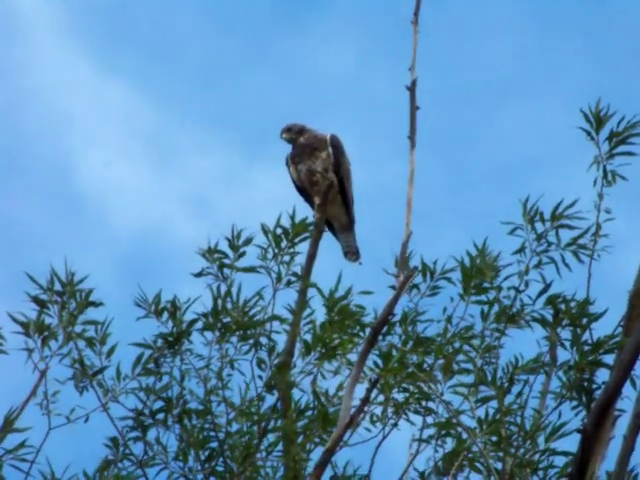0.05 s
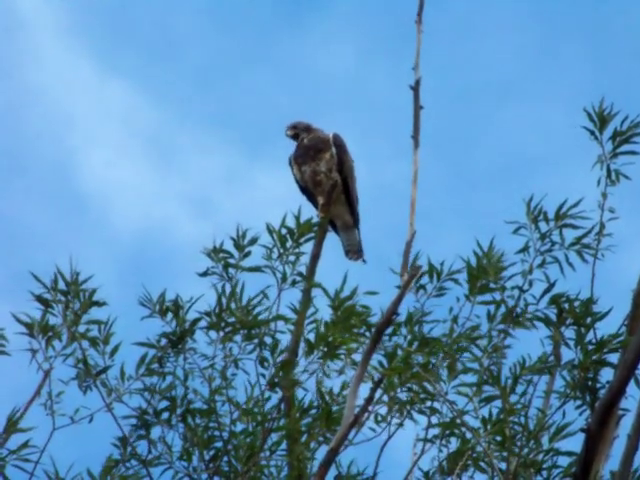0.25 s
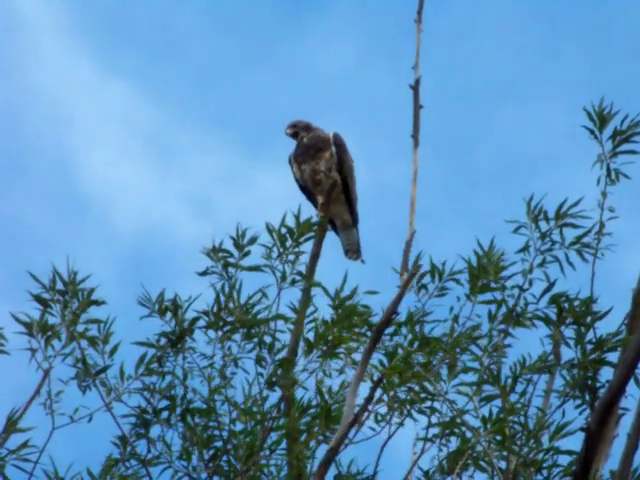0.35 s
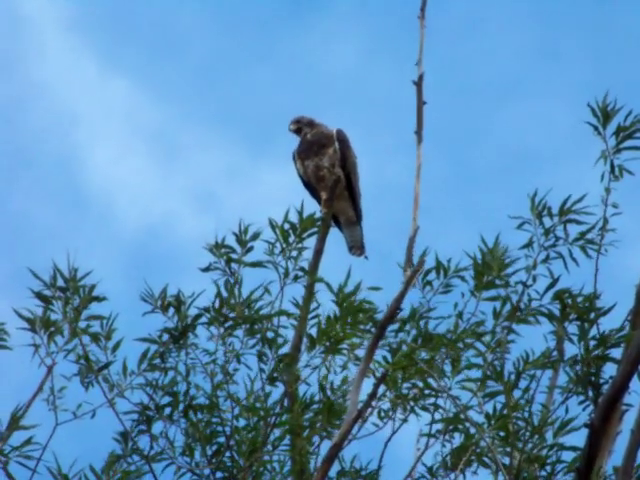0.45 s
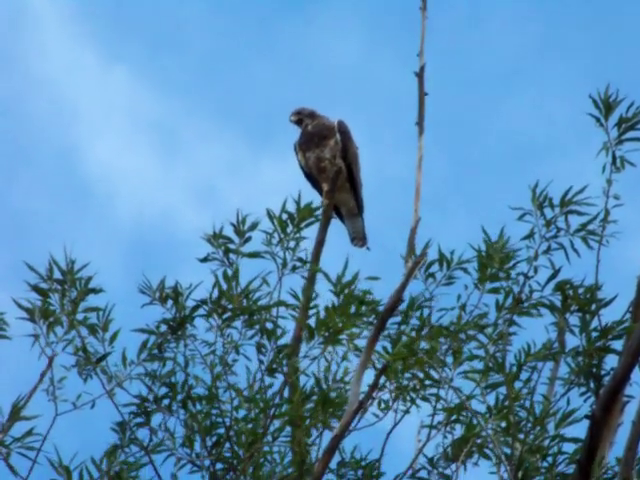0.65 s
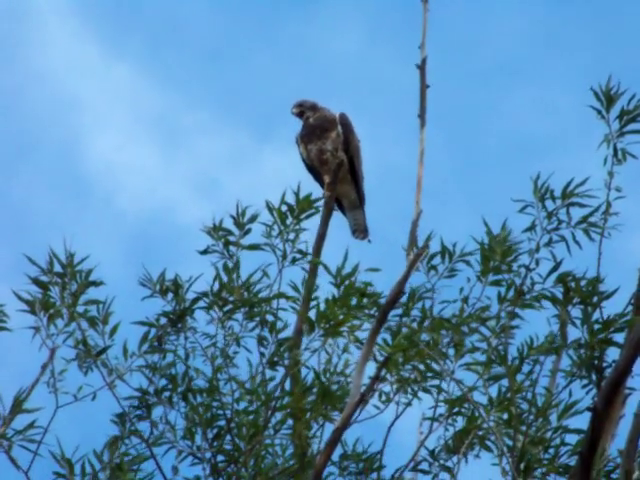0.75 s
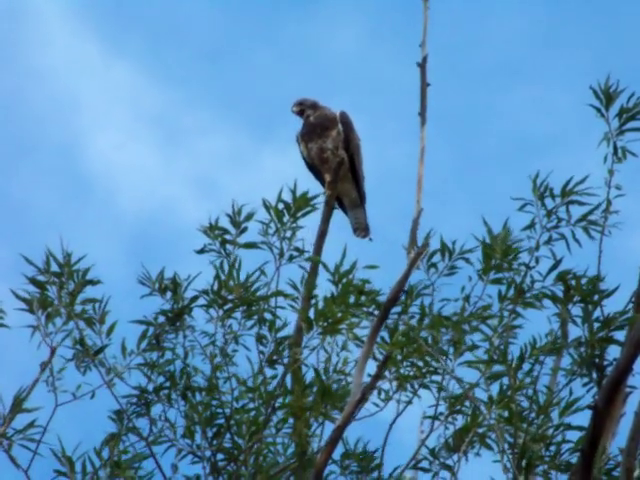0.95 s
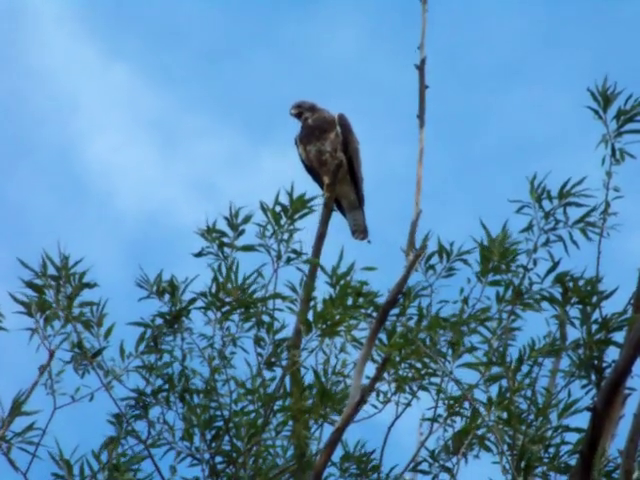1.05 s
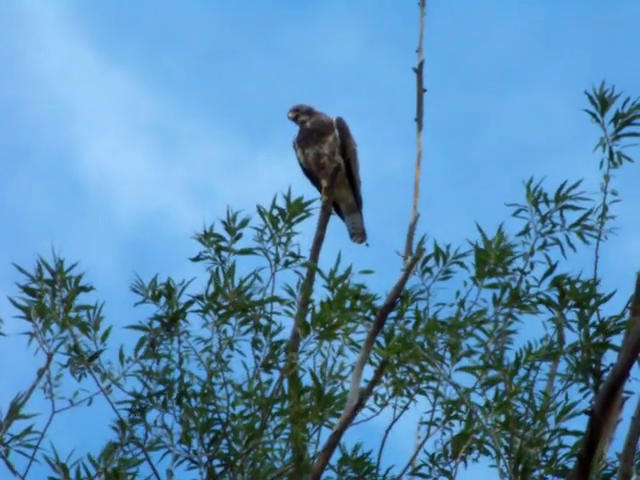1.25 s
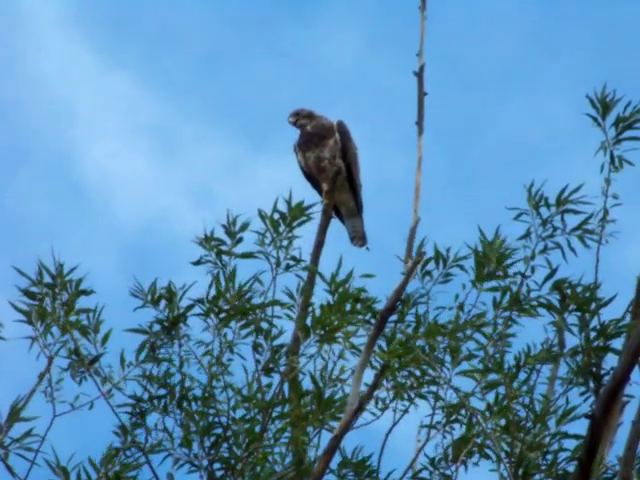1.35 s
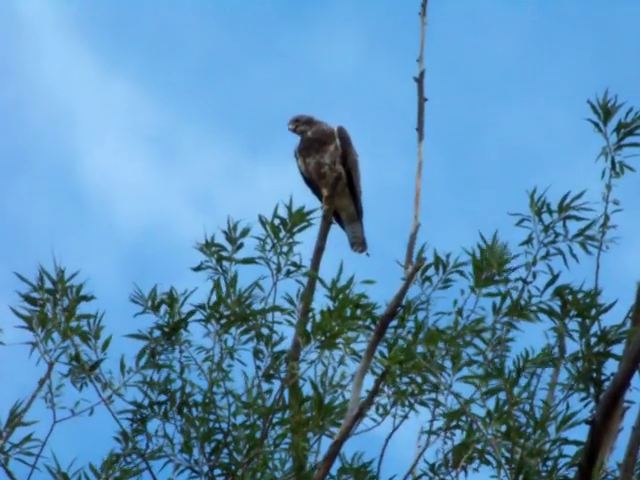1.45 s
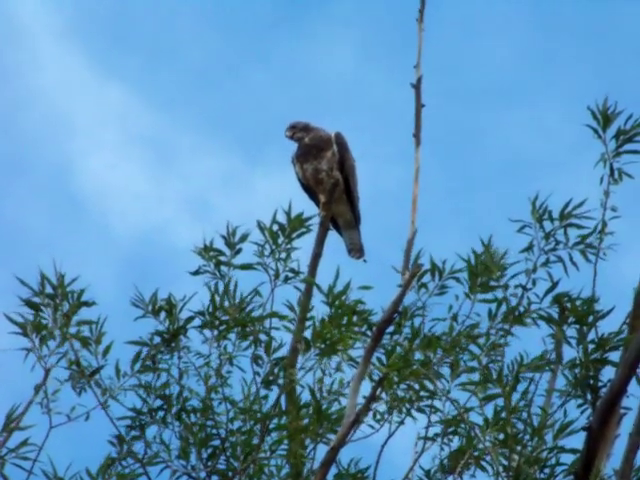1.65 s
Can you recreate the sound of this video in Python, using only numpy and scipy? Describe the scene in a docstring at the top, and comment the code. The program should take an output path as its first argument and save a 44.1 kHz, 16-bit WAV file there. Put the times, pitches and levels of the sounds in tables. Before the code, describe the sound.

Over quiet outdoor air with a few faint bumps, a young bird of prey gives a single scream from a treetop. It rises, cracks, drops, then turns to a fading rasp that trails into a thin, steady whistle.

```python
"""Outdoors among trees, over faint air noise and a few dull bumps, a young hawk screams once.
Its syrinx is a nonlinear oscillator: the note arches up with period doubling, cracks into chaos at the
top, falls cleanly, breaks into a long hoarse rasp and ends in a thin whistle. The throat filters the
voice; near surfaces return quick echoes, and scattering from the trees adds a faint tail."""
import sys
import numpy as np
from scipy import signal
from scipy.fft import rfft, irfft
from scipy.io import wavfile
from scipy.ndimage import uniform_filter1d

SR = 44100
rng = np.random.default_rng(int(sys.argv[2]) if len(sys.argv) > 2 else 0)


def to_wav(s):
    """Save 16-bit WAV."""
    ch = np.atleast_2d(s).T  # columns
    pcm = np.round(np.clip(ch, -1, 1) * 32767)  # PCM
    wavfile.write(sys.argv[1], SR, pcm.astype(np.int16))


N = 74970
T = np.arange(N) / SR

# Spectrum of the outdoor air: f/Hz, relative level/dB
AIR_SPECTRUM = [(20, -31.5), (36, -25.5), (45, 10), (55, -6.5), (80, -7), (110, -0.5), (220, -9),
                (310, -18), (420, -5), (560, -2.5), (830, 0), (1300, -7.5), (2000, -11), (3300, -10.5),
                (4800, -13.5), (7200, -19), (8300, -27)]
# Likeness of the air at left and right: f/Hz, shared fraction of power
AIR_COHERENCE = [(40, 0.69), (300, 0.071), (1000, 0.38), (6000, 0.9)]
# Balance of the air: f/Hz, left minus right level/dB
AIR_LEAN = [(40, -10), (130, -2.5), (300, 1.5), (900, -1.5), (3000, 6), (5000, 1)]
# Background bumps: onset t/s, level/dB
BUMPS = [(0.032, -53.5), (0.141, -51), (0.208, -44.5), (0.97, -48), (1.658, -47.5)]
# Fundamental of the scream: t/s, f/Hz
SCREAM_PITCH = [(.228, 1029), (.241, 1152), (.255, 1308), (.273, 1411), (.286, 1465), (.293, 1560),
                (.308, 1630), (.331, 1480), (.351, 1404), (.379, 1331), (.401, 1276), (.43, 1236),
                (.465, 1199), (.478, 1240), (.58, 1214), (.66, 1236), (.77, 1188), (1.33, 1153)]
# Envelope of the voiced part: t/s, level/dB
VOICE_LEVEL = [(.228, -63.5), (.236, -40), (.242, -28.5), (.27, -26.5), (.31, -24), (.35, -27.5),
               (.40, -28), (.464, -26.5), (.471, -35), (.57, -36.5), (.66, -44), (.8, -48), (.96, -49),
               (1.22, -55), (1.32, -62), (1.335, -78)]
# Chaos in the oscillation: t/s, roughness (0 clear, 1 chaotic)
ROUGHNESS = [(.233, 0.77), (.242, 0.06), (.283, 0.12), (.291, 0.64), (.335, 0.98), (.344, 0.09),
             (.41, 0.11), (.463, 0.1), (.471, 0.87), (.78, 1.01), (1.33, .95)]
# Brief clear notes within the rasp: centre t/s, duration/s, boost/dB
CLEAR_NOTES = [(.488, 0.01117, 4.5), (0.506, 0.01079, 4.5), (0.531, .014, 5), (0.555, 0.01107, 5),
               (0.569, 0.01194, 6), (0.592, 0.01098, 7), (0.618, 0.008654, 6.5), (0.65, 0.01797, 7),
               (0.722, 0.01338, 8.5), (.765, 0.0196, 4.5), (0.905, .012, 5), (0.951, .026, 9.5),
               (0.999, 0.0093, 6.5), (1.217, 0.021, 11.5)]
# Source spectrum of the syrinx: multiple of the fundamental, relative level/dB
SYRINX_PARTIALS = [(1, -14.5), (1.5, -13.5), (2, 0), (2.5, -2.5), (3, -3.5), (3.5, -3), (4, -15),
                   (4.5, -12), (5, -15), (6, -29)]
# Period doubling, heard as lines halfway between the harmonics: t/s, gain/dB
DOUBLING_GAIN = [(.25, -44), (.268, -2.5), (.3, -14.5), (.36, -6.5), (.395, -9), (.425, -57)]
# Response of the throat to the partials: f/Hz, gain/dB
THROAT_RESPONSE = [(1100, -6.5), (1260, -5), (1380, 3), (2400, -1), (3200, -4), (3600, -2), (4250, 0),
                   (4750, -9.5), (5500, 3), (7100, -2), (7700, -11.5)]
# Spectrum of the hoarse rush of air: f/Hz, relative level/dB
RASP_SPECTRUM = [(700, -41.5), (1300, -9.5), (1650, -5), (1950, -8.5), (2200, 2.5), (2700, 1.5), (3350, -4),
                 (4000, -14.5), (4600, -23), (5350, -4), (6200, -19), (7200, -15.5), (8300, -33.5)]
# Envelope of that rush: t/s, level/dB
RASP_LEVEL = [(.222, -67), (.236, -37.5), (.248, -46), (.282, -45), (.291, -30), (.333, -31), (.346, -43),
              (.41, -43.5), (.463, -49.5), (.472, -35.5), (.57, -40), (.64, -38), (.8, -37), (.96, -39),
              (1.1, -39.5), (1.24, -42), (1.322, -47), (1.332, -51), (1.7, -67)]
# Course of the closing whistle: t/s, f/Hz, level/dB
WHISTLE_COURSE = [(1.24, 1384, -85), (1.29, 1373, -50.5), (1.327, 1364, -49), (1.342, 1415, -51),
                  (1.37, 1389, -49.5), (1.492, 1366, -45.5), (1.587, 1375, -46), (1.618, 1360, -47.5),
                  (1.7, 1369, -48)]
# Harmonics of the whistle, from the fundamental up: relative level/dB
WHISTLE_HARMONICS = [1, 2.5, -15, -14, -18]
# Level difference of the arriving call: f/Hz, left minus right level/dB
CALL_BALANCE = [(1300, -.5), (2300, 4), (3200, 10), (3800, 3.5), (4500, -3), (5700, -8), (6300, -2.5),
                (7200, 2.5)]
# Phase difference of the arriving call: f/Hz, lead of the left/rad
CALL_LEAD = [(1200, .15), (2800, 0.99), (3600, -0.97), (5000, -1), (5900, 1), (6800, 0.49), (7700, .1)]
# Echoes off near surfaces: left delay/s, right delay/s, left gain, right gain
REFLECTIONS = [(.00638, .00644, 0.47, 0.52), (.0086, .0085, 0.032, 0.23)]
# Share of a stereo difference given to the left and to the right
SIDES = np.array([[.5], [-.5]])


def amp(db):
    """Amplitude ratio of a level in decibels."""
    return 10 ** (np.asarray(db) / 20)


def unit(x):
    """Normalisation to an rms of 1."""
    return x / np.sqrt(np.mean(abs(x) ** 2) + 1e-20)


def curve(rows, t=T):
    """Linear interpolation of a table in time."""
    return np.interp(t, *np.transpose(rows))


def spectrum(rows, hz):
    """Interpolation of a table on a logarithmic frequency axis."""
    f, value = np.transpose(rows)
    return np.interp(np.log(hz + 1), np.log(f + 1), value)


def wander(hz):
    """Low-pass Gaussian noise: smooth random motion up to about the given rate."""
    f = np.fft.rfftfreq(N, 1 / SR)
    return unit(irfft(rfft(rng.standard_normal(N)) * np.exp(-.5 * (f / hz) ** 2), N))


def grid(size):
    """Frame times (a column) and bin frequencies of a short-time Fourier transform."""
    return np.arange(4 * N // size + 5)[:, None] * size / 4 / SR, np.fft.rfftfreq(size, 1 / SR)


def noise(gain, size):
    """Random-phase synthesis: noise of rms 1, shaped by short-time magnitudes."""
    bins = gain * (rng.standard_normal(gain.shape) + 1j * rng.standard_normal(gain.shape))
    return unit(signal.istft(bins.T, nperseg=size, noverlap=size * 3 // 4)[1][:N])


def air(level_db=-50.5, patch_db=2, size=2048):
    """Partially coherent noise: rumble leaning right and rustle leaning left drift in patches."""
    t, f = grid(size)
    patches = uniform_filter1d(rng.standard_normal((len(t), len(f))), size=4, axis=0)
    patches = unit(uniform_filter1d(patches, size=14, axis=1))
    gain = amp(spectrum(AIR_SPECTRUM, f) + patch_db * patches)
    coherence = np.clip(spectrum(AIR_COHERENCE, f), .01, .99)
    share = np.sum(gain ** 2 * coherence) / np.sum(gain ** 2)
    apart = np.array([noise(gain * np.sqrt(1 - coherence), size) for _ in range(2)])
    common = noise(gain * np.sqrt(coherence), size)
    field = amp(level_db) * (np.sqrt(share) * common + np.sqrt(1 - share) * apart)
    lean = amp(SIDES * spectrum(AIR_LEAN, np.fft.rfftfreq(N, 1 / SR)))
    return irfft(rfft(field) * lean, N)


def bumps(centre_hz=906, width_hz=110, rise_s=.0036):
    """Narrow-band noise in pulses too short for a clear pitch is heard as dull bumps."""
    envelope = np.zeros(N)
    for onset, db in BUMPS:
        age = np.maximum(T - onset, 0) / rise_s
        envelope += amp(db) * age * np.exp(1 - age)
    band = (wander(width_hz) + 1j * wander(width_hz)) * np.exp(2j * np.pi * centre_hz * T)
    return envelope * unit(band.real)


def syrinx(pitch, phase, fuzz, onset_db=-19, onset_s=.017, dispersion_rad=.906):
    """Source and filter: harmonics and half multiples, blurred by chaos, are weighted by the throat."""
    voice = np.zeros(N)
    start = VOICE_LEVEL[0][0]
    lag_db = onset_db * np.exp(-np.maximum(T - start, 0) / onset_s)
    for k, db in SYRINX_PARTIALS:
        blur = np.sqrt(2 * (1 - fuzz ** 2)) + fuzz * (wander(hz=149) + 1j * wander(hz=149))
        late_db = lag_db * min(abs(k - 2), 2)  # the second harmonic speaks first
        doubling_db = curve(DOUBLING_GAIN) if k % 1 else 0
        chaos_db = -2 * max(k - 3, 0) * fuzz  # chaos dissolves the upper partials
        gain = amp(db + spectrum(THROAT_RESPONSE, k * pitch) + late_db + doubling_db + chaos_db)
        smear = dispersion_rad * k ** 2  # the throat spreads each pulse in time
        voice += gain * (blur * np.exp(1j * (k * phase + smear))).real
    return voice * (T > start)


def rasp(reference_hz=1243, follow=.44, size=256):
    """Formant shift: the spectrum of rushing air rises as the throat tightens with pitch."""
    t, f = grid(size)
    tightening = (curve(SCREAM_PITCH, t) / reference_hz) ** follow
    return noise(amp(spectrum(RASP_SPECTRUM, f / tightening)), size) * amp(curve(RASP_LEVEL))


def scream(jitter=.0377, flutter=.0149, shimmer=.17):
    """Chaotic modulation: roughness unsettles the pitch and shakes voice and rasp together."""
    grip, boost_db, slide = catches()
    rough = np.clip(curve(ROUGHNESS) * (1 - .74 * grip), 0, 1)
    pitch = curve(SCREAM_PITCH) * (1 + slide)
    unsteady_hz = pitch * (1 + rough * (jitter * wander(hz=191.5) + flutter * wander(hz=52)))
    phase = 2 * np.pi * np.cumsum(unsteady_hz) / SR
    voice = syrinx(pitch, phase, fuzz=.76 * rough) * amp(curve(VOICE_LEVEL) + boost_db)
    rush = rasp()
    depth = shimmer * rough
    shake = (1 + depth * wander(hz=220)) / np.sqrt(1 + depth ** 2)  # mean power is conserved
    return shake * (voice + rush)


def catches(drop=.065, sag=.021):
    """Intermittency: the chaotic voice briefly grips a clearer, louder, lower note that slides down."""
    centre, duration, peak_db = np.transpose(CLEAR_NOTES)[:, :, None]
    offset = (T - centre) / (duration / 2)
    grip = np.exp(-.5 * offset ** 2)
    boost_db = (grip * peak_db).sum(0)
    slide = -(grip * (drop + sag * offset)).sum(0)  # fraction of the pitch
    return np.minimum(grip.sum(0), 1), boost_db, slide


def whistle(jitter=.0051):
    """Periodic oscillation: as the effort runs out, the voice locks onto a thin steady note."""
    t, hz, db = np.transpose(WHISTLE_COURSE)
    pitch = np.interp(T, t, hz) * (1 + jitter * wander(hz=200.7))
    phase = 2 * np.pi * np.cumsum(pitch) / SR
    note = sum(gain * np.cos(k * phase) for k, gain in enumerate(amp(WHISTLE_HARMONICS), 1))
    return unit(note) * amp(np.interp(T, t, db)) * (T > t[0])


def outdoors(call, trees_db=-18, trees_t60_s=.25):
    """Superposition: direct sound, two reflections and scatter from the trees add on each side."""
    size = 2 * N
    f = np.fft.rfftfreq(size, 1 / SR)
    arrival = amp(SIDES * spectrum(CALL_BALANCE, f)) * np.exp(1j * SIDES * spectrum(CALL_LEAD, f))
    echoes = sum(row[2:] * np.exp(-2j * np.pi * f * row[:2]) for row in np.array(REFLECTIONS)[:, :, None])
    tail = rng.standard_normal((2, N)) * amp(-60 * T / trees_t60_s)
    scatter = amp(trees_db) * rfft(tail / np.linalg.norm(tail[0]), size)
    return irfft(rfft(call, size) * arrival * (1 + echoes + scatter), size)[:, :N]


def scene():
    """Sound pressures add: the hawk in its treetop, the air and the bumps."""
    return outdoors(scream() + whistle()) + air() + bumps()


def record(dry, cutoff_hz=7800):
    """Band limiting: a linear-phase low-pass filter removes the highest treble."""
    lowpass = signal.firwin(141, cutoff_hz, window=("kaiser", 8), fs=SR)
    return signal.oaconvolve(dry, lowpass[None], "same")


dry = scene()
out = record(dry)
to_wav(out)
```